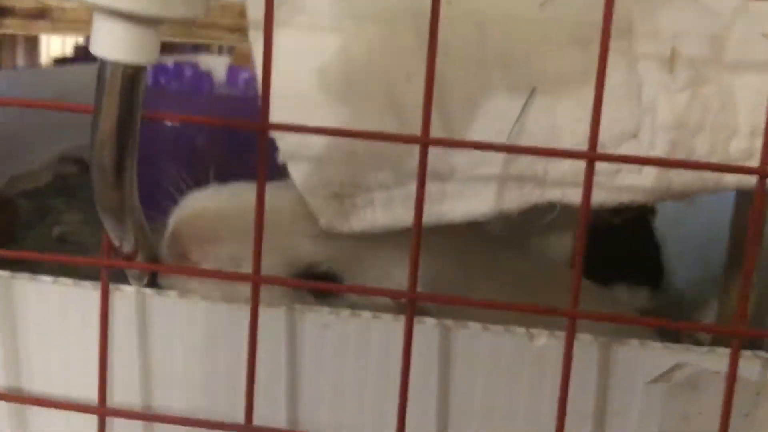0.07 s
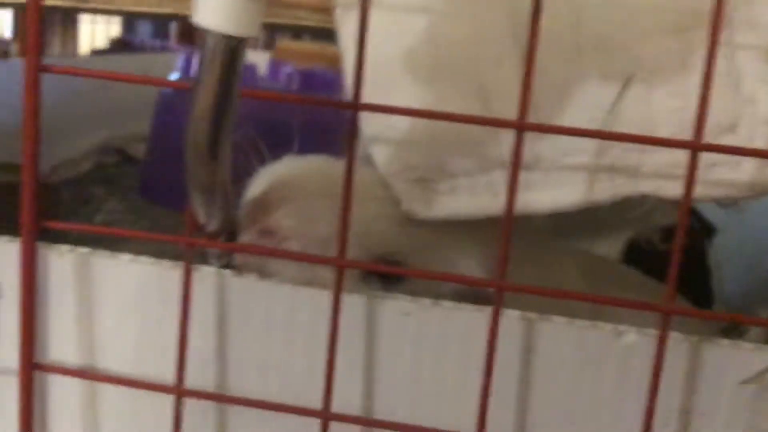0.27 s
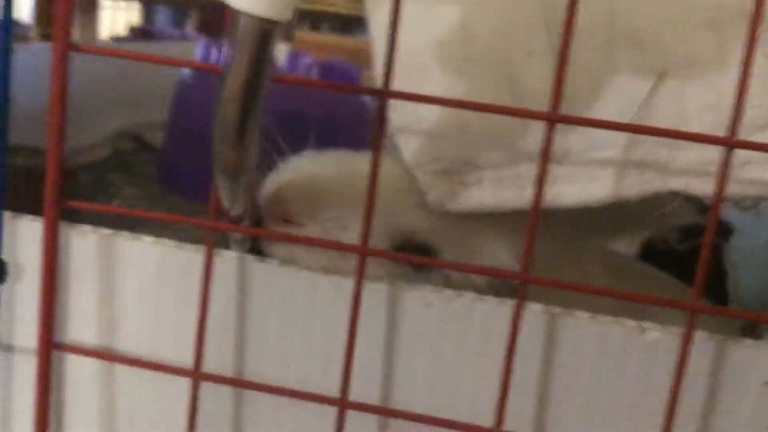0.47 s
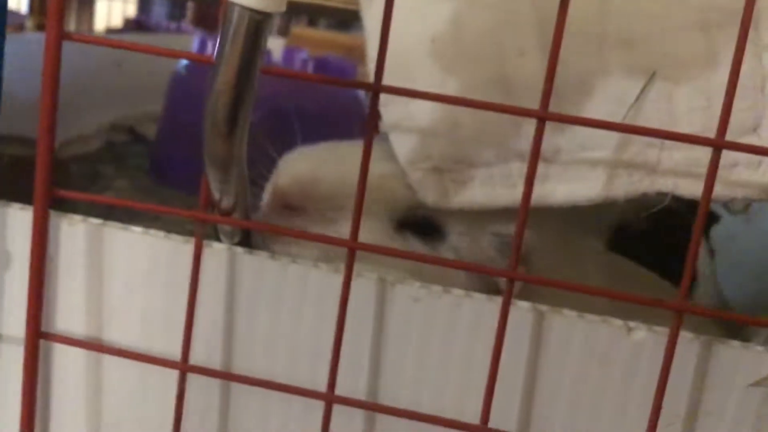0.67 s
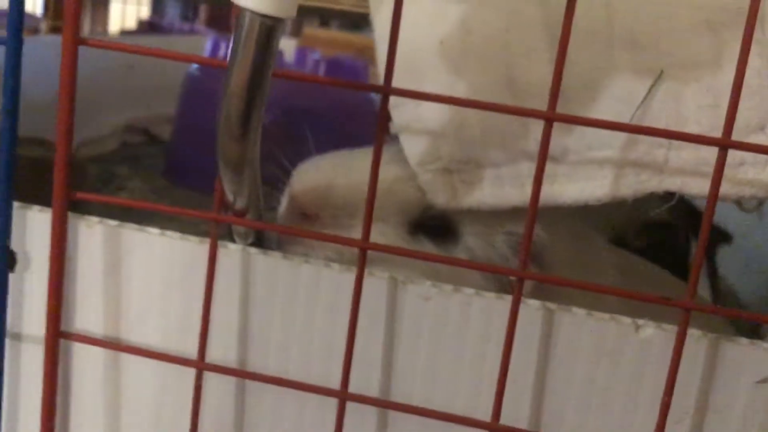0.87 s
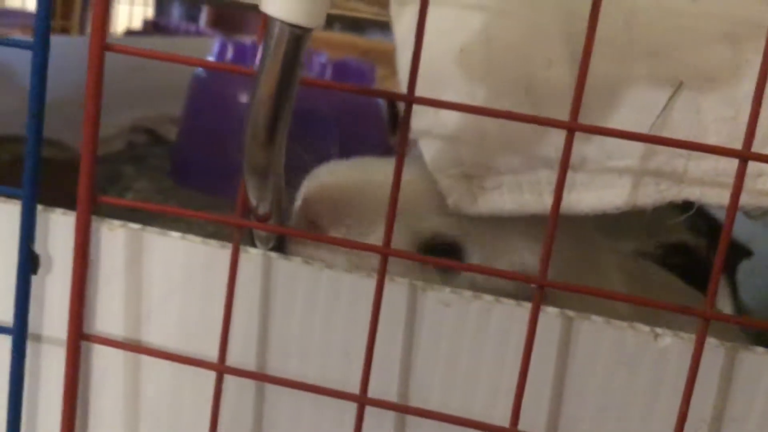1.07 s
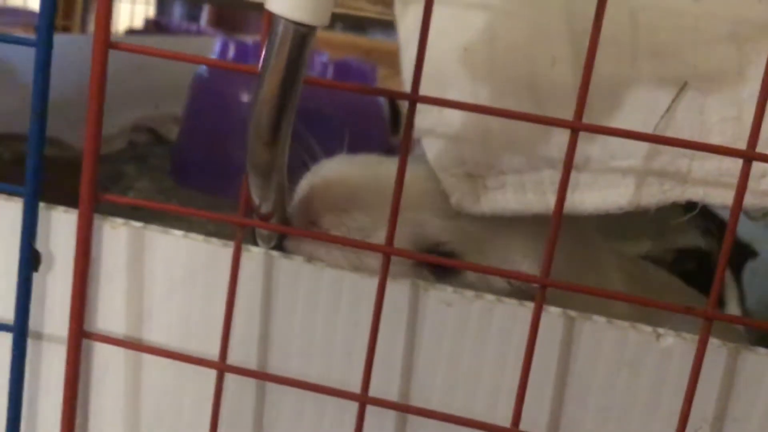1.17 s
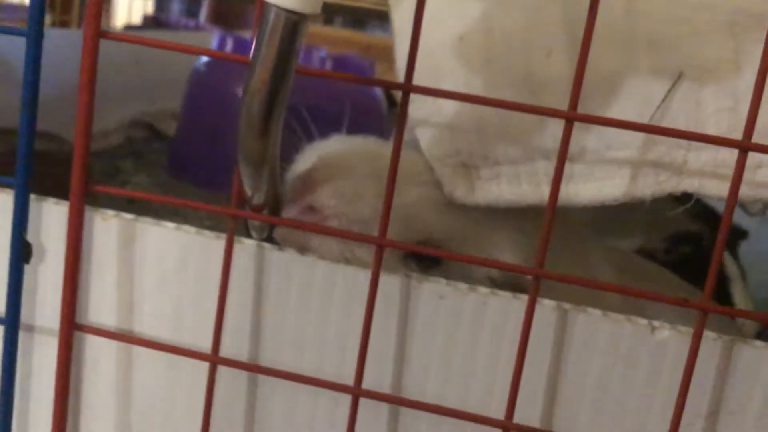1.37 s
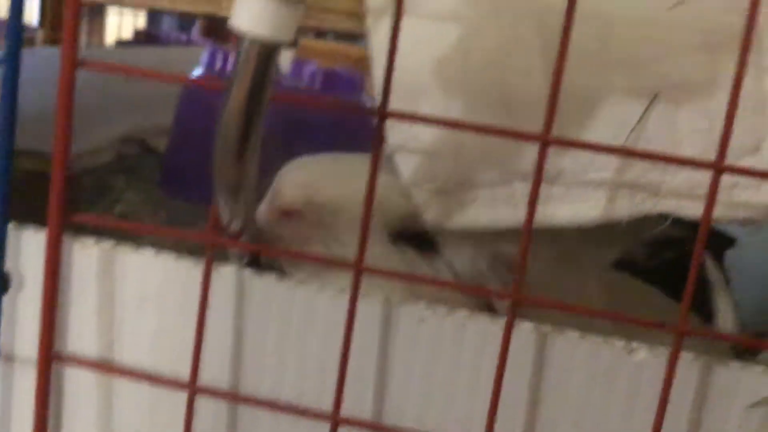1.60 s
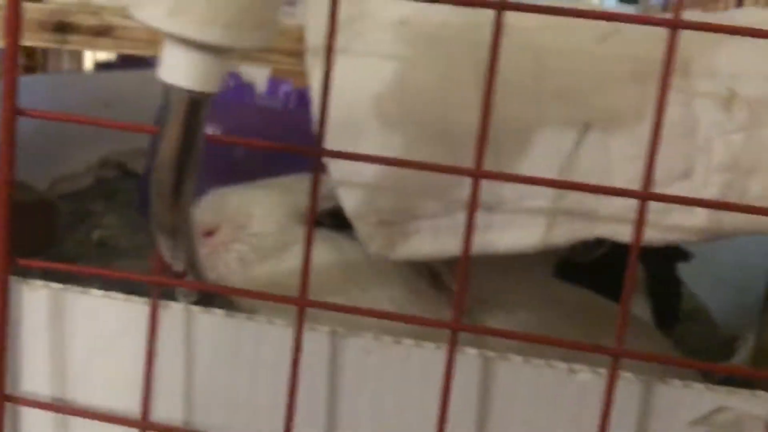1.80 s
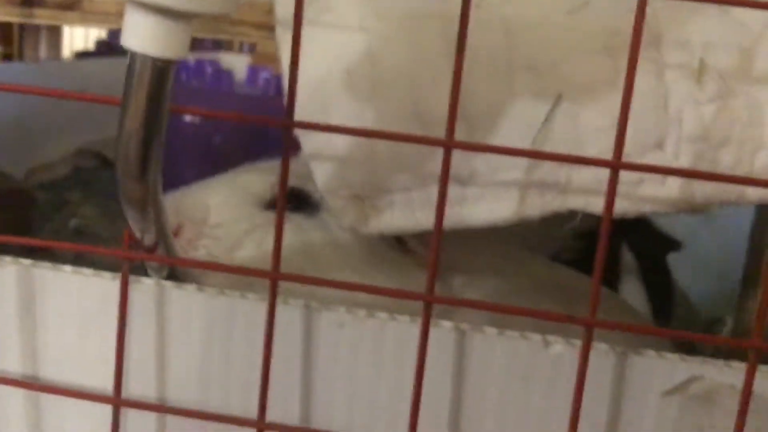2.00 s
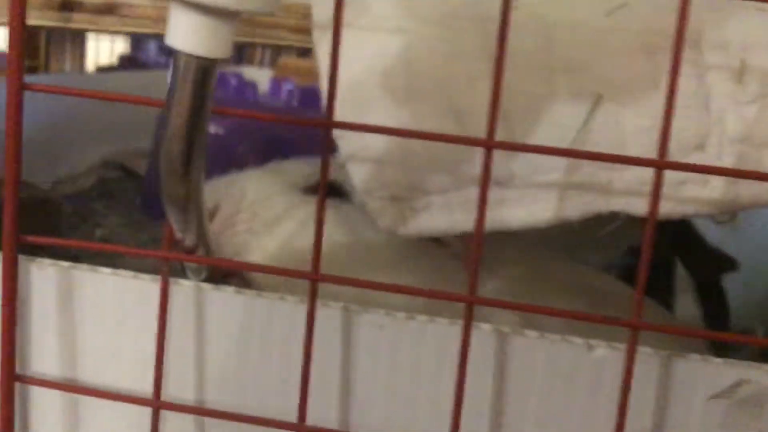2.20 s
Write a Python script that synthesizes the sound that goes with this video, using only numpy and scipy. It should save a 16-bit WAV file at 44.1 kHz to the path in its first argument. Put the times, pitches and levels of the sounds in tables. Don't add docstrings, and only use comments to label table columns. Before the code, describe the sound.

Sparse, tiny metallic clicks from a guinea pig drinking at a bottle spout in a quiet indoor room, preceded by a short bright hiss and louder dull knocks and skin rubs on the handheld recorder.

```python
import sys
import numpy as np
from scipy import signal
from scipy.io import wavfile

SR = 44100
rng = np.random.default_rng(int(sys.argv[2]) if len(sys.argv) > 2 else 0)


def to_wav(sig):
    pcm = np.clip(np.atleast_2d(sig), -1, 1) * 32767
    pcm = np.round(pcm).astype(np.int16)
    wavfile.write(sys.argv[1], SR, pcm.T)


def linear_from_db(decibels):
    return 10 ** (np.asarray(decibels, float) / 20)


N = 99225

# pitch_hz, level_db
ROOM_TONE = [(15, -26), (25, -10), (59, -0.5), (135, -11), (176, -23), (264, -24), (1030, -40.5),
             (4870, -46), (15000, -57.5)]
# pitch_hz, level_db
WHINE = [(9001, -103)]
# pitch_hz, level_db (per Hz)
HISS_TONE = [(100, -11.5), (250, -4.5), (600, -15.5), (1500, -25), (3000, -29.5), (7000, -29.5),
             (10000, -33.5), (16000, -34)]
# time_s, top_edge_hz, level_db
HISS_CLOSING = [
    (0, 18000, -66),
    (0.11, 18000, -62),
    (0.165, 12900, -65),
    (0.21, 7000, -60),
    (0.245, 4500, -60.5),
    (0.275, 1800, -66),
    (0.34, 607, -84.5),
]
# time_s, level_db
GRIP = [
    (0, -64),
    (.19, -57),
    (.222, -39),
    (.25, -41.5),
    (.36, -50.5),
    (.39, -52),
    (.44, -43),
    (.51, -64.5),
    (.75, -68),
]
# middle_s, half_width_s, boost_db
FIRST_SLIDE = (0.2344, 0.027, 12.5)
# start_s, peak_db, top_hz, length_ms
SNAPS = [(0.1621, -55.5, 15200, 2.06), (0.162, -60, 2400, 3.9), (0.2147, -57.5, 9500, 1.3),
         (0.25, -69, 5000, 1.3), (.287, -74, 4000, 2.4), (.301, -70, 3000, 3.2), (.318, -66.5, 4000, 2.1),
         (.340, -74, 6000, 1.5), (0.358, -69.5, 4000, 3.6), (0.367, -70, 4000, 1.5), (.377, -68, 3500, 1.1),
         (0.404, -69.5, 3500, 3.4), (0.437, -75, 4000, 1.5), (.456, -67, 4000, 2.7),
         (0.4603, -60.5, 4500, 2.66), (0.4603, -63, 8800, 1.75)]
# start_s, peak_db, contact_cut_hz, ring_ms, direction (push 1, pull -1)
KNOCKS = [(0.2138, -41, 280, 10, 1), (0.2217, -33.5, 260, 8.6, 1), (0.2375, -34, 220, 5.4, 1),
          (.246, -25, 220, 3, -1), (.2499, -25, 140, 11.4, 1), (0.2574, -26.5, 200, 36, -1),
          (0.2797, -37, 140, 23, 1), (0.33, -35.5, 350, 3.5, 1), (0.337, -33, 140, 22, 1),
          (0.3599, -37, 300, 4.9, 1), (0.4064, -28, 140, 13, -1), (0.4059, -35, 450, 4.6, 1),
          (0.4398, -34.5, 400, 8.7, -1), (0.461, -25.5, 554, 4.8, 1), (0.4631, -39.5, 140, 51, 1),
          (0.4632, -20, 328, 6.5, 1)]
# start_s, peak_db, bass_weight (0-1.2), ring_ms
TICKS = [(0.5007, -45.5, 0.9, 5.6), (0.5402, -65, 0.4, 2), (.5488, -50.5, 0.29, 27), (.566, -66, 0.5, 4),
         (.577, -62, 0.5, 5.1), (0.5941, -56.5, 1, 8.4), (.6162, -51.5, 0.36, 30),
         (0.638, -64.5, 0.26, 4.3), (0.682, -60.5, 0.57, 4.8), (.7008, -57, 0.64, 5.3),
         (0.7475, -51, 0.36, 9.3), (.9118, -55, 0.45, 6.4), (1.3131, -47.5, 1.0, 3.9),
         (1.6047, -51, 0.73, 5), (1.6523, -61, 1, 3.7), (1.7824, -61.5, 0.6, 7), (1.8267, -46.5, 0.41, 6.9),
         (2.0179, -58, 0.34, 4.5), (2.047, -54, 0.7, 22), (2.0599, -52, 0.92, 8.3),
         (2.1768, -52, 0.39, 12.5)]

ROOM_DB, WHINE_WIDTH_HZ = -61.5, 3.1
EDGE_DB_PER_OCTAVE = 47
GRIP_DB, RUBS_PER_S, RUB_CUT_HZ, RUB_RING_MS = 1, 700, 485, 10.3
CRACKLE_DB, CRACKLES_PER_S, CRACKLE_CUT_HZ = -21, 1800, 780
SNAP_SPAN_OCTAVES = 3.0
FIRST_SWING_MS, SWING_STRETCH = 0.2, 2.3
KNOCK_WEIGHT, TICK_CUT_HZ = 0.3, 23000
MIC_CUT_HZ, RUMBLE_CUT_HZ = 45, 43


def rms_one(x):
    return x / np.sqrt(np.mean(x ** 2) + 1e-20)


def in_time(rows):
    time_s, *columns = np.transpose(rows)
    return [np.interp(np.arange(N) / SR, time_s, column) for column in columns]


def filtered(x, order, cut_hz, kind):
    return signal.sosfilt(signal.butter(order, cut_hz, kind, fs=SR, output="sos"), x)


def drift(rate_hz):
    r = np.exp(-2 * np.pi * rate_hz * 40 / SR)
    slow = signal.lfilter([1], [1, -2 * r, r * r], rng.standard_normal(N // 40 + 2002))
    slow = rms_one(slow[2000:])
    return np.interp(np.arange(N) / 40, np.arange(len(slow)), slow)


def flickering_noise(tone, flicker_db, treble_calm, edge_hz=None):
    out = 0
    together = drift(3.0)
    edges = 22 * 2 ** np.arange(0, 9.7, 1 / 3)
    white = rng.standard_normal((2, N + SR // 2))
    tone_hz, tone_db = np.transpose(tone)
    for k, (low, high) in enumerate(zip(edges, edges[1:])):
        band = filtered(white[k % 2], 2, [low, high], "band")[SR // 2:]
        hz = np.sqrt(low * high)
        flicker = flicker_db * (0.42 * together + drift(29))
        db = np.interp(np.log(hz), np.log(tone_hz), tone_db)
        db = db + flicker * min(1, 200 / hz) ** treble_calm
        if edge_hz is not None:
            octaves_above = np.maximum(np.log2(hz / edge_hz), 0)
            db = db - EDGE_DB_PER_OCTAVE * octaves_above
        out = out + linear_from_db(db) * band
    return out


def chirp(cut_hz, ring_ms, weight, order):
    ms = (np.arange(SR // 8) + 0.5) * 1000 / SR
    swings = np.cos(np.pi * np.log(ms / FIRST_SWING_MS) / np.log(SWING_STRETCH))
    onset = 1 - np.exp(-(ms / 0.085) ** 2)
    wave = swings * ms ** weight * np.exp(-(ms / ring_ms) ** 2) * onset
    wave = filtered(wave, order, np.clip(cut_hz, 50, 18000), "low")
    return wave / np.abs(wave).max()


def place(timed_waves):
    out = np.zeros(N + SR)
    for start_s, wave in timed_waves:
        start = int(start_s * SR)
        out[start:start + len(wave)] += wave
    return out[:N]


def slips(per_s, wave):
    happens = rng.random(N) < per_s / SR
    strength = linear_from_db(4.5 * np.minimum(rng.exponential(1, N), 3))
    clicks = happens * strength * rng.choice([-1, 1], N)
    return rms_one(signal.fftconvolve(clicks, wave)[:N])


def room():
    noise = rms_one(flickering_noise(ROOM_TONE, flicker_db=2.2, treble_calm=0.5))
    (whine_hz, whine_db), = WHINE
    turns = np.cumsum(whine_hz + WHINE_WIDTH_HZ * drift(8)) / SR
    return linear_from_db(ROOM_DB) * noise + linear_from_db(whine_db + 4) * np.sin(2 * np.pi * turns)


def opening_hiss():
    edge_hz, level_db = in_time(HISS_CLOSING)
    hiss = flickering_noise(HISS_TONE, flicker_db=2.8, treble_calm=0.017, edge_hz=edge_hz)
    return linear_from_db(level_db) * hiss / hiss[:SR // 10].std()


def rub():
    t = np.arange(N) / SR
    grip_db, = in_time(GRIP)
    fade = np.clip((GRIP[-1][0] + 0.12 - t) / 0.19, 0, 1)
    dull = slips(RUBS_PER_S, chirp(RUB_CUT_HZ, RUB_RING_MS, weight=0.51, order=3))
    fine = slips(CRACKLES_PER_S, chirp(CRACKLE_CUT_HZ, ring_ms=2.37, weight=0.38, order=2))
    middle_s, half_width_s, boost_db = FIRST_SLIDE
    slide_db = boost_db * np.exp(-((t - middle_s) / half_width_s) ** 2)
    return linear_from_db(grip_db + GRIP_DB) * fade * (dull + linear_from_db(CRACKLE_DB + slide_db) * fine)


def snaps():
    out = np.zeros(N)
    t = np.arange(N) / SR
    white = rng.standard_normal(N)
    for start_s, peak_db, top_hz, length_ms in SNAPS:
        burst = filtered(white, 3, [top_hz / 2 ** SNAP_SPAN_OCTAVES, top_hz], "band")
        middle_s = start_s + length_ms / 2000
        swell = np.exp(-((t - middle_s) / (length_ms / 2500)) ** 2)
        out += linear_from_db(peak_db) * rms_one(burst) * swell
    return out


def knocks():
    waves = []
    for start_s, peak_db, cut_hz, ring_ms, direction in KNOCKS:
        thump = chirp(cut_hz, ring_ms, KNOCK_WEIGHT, order=5)
        waves.append((start_s, np.sign(direction) * linear_from_db(peak_db) * thump))
    return place(waves)


def spout_ticks():
    waves = []
    for start_s, peak_db, bass_weight, ring_ms in TICKS:
        tick = chirp(TICK_CUT_HZ, ring_ms, bass_weight, order=2)
        waves.append((start_s, linear_from_db(peak_db) * tick))
    return place(waves)


def scene():
    case = filtered(rub() + knocks() + spout_ticks(), 2, MIC_CUT_HZ, "high")
    mix = room() + opening_hiss() + snaps() + case
    return filtered(mix, 4, RUMBLE_CUT_HZ, "high")[None]


def low_pass(x):
    return signal.sosfilt(signal.butter(12, 15730, fs=SR, output="sos"), x)


def record(dry):
    return low_pass(dry)


dry = scene()
out = record(dry)
to_wav(out)
```